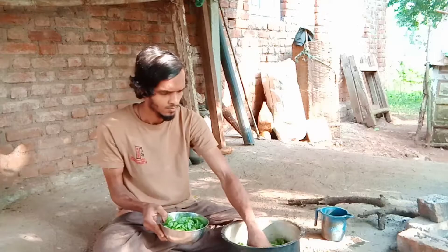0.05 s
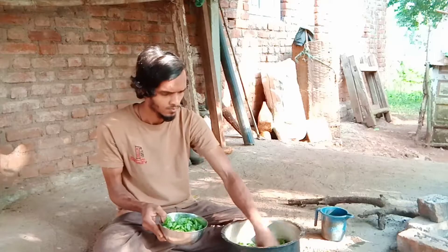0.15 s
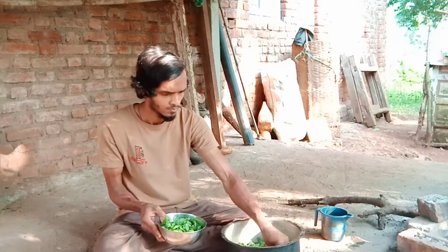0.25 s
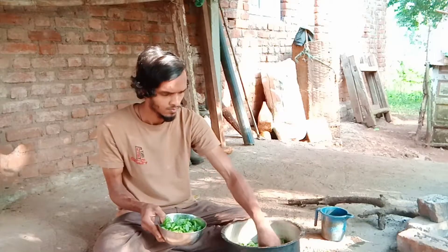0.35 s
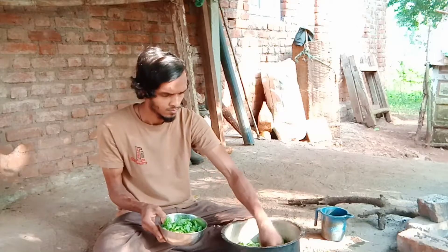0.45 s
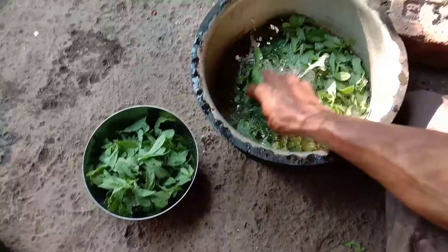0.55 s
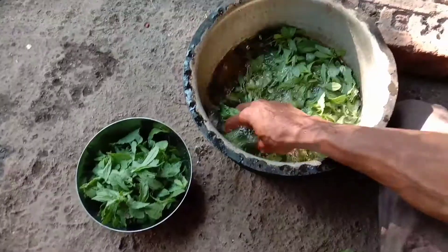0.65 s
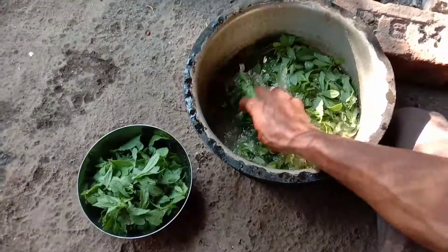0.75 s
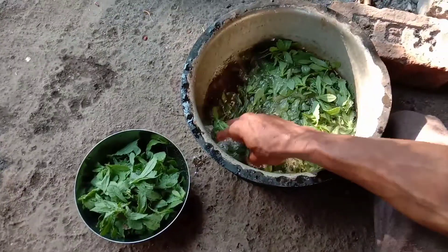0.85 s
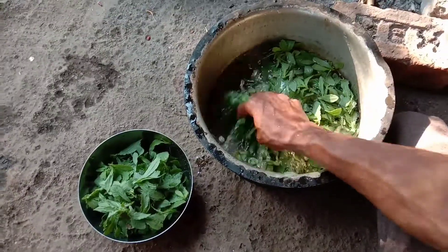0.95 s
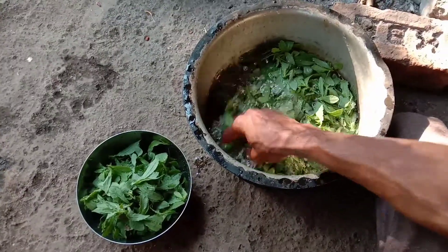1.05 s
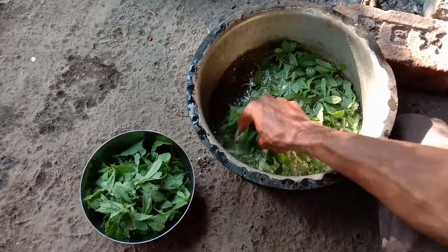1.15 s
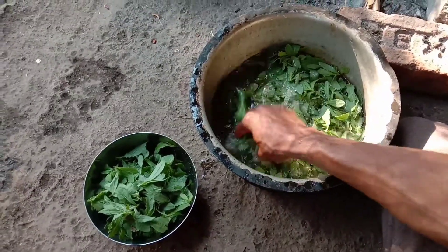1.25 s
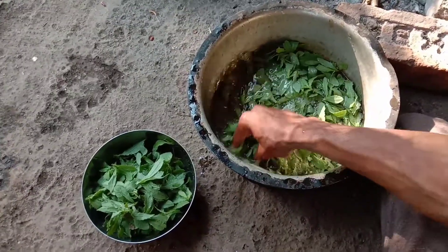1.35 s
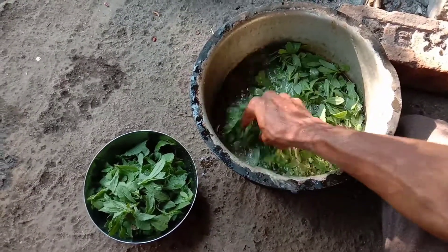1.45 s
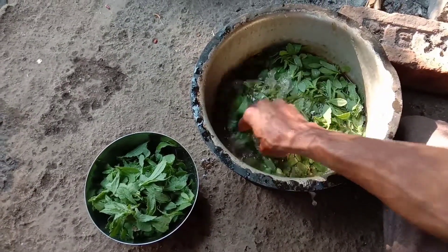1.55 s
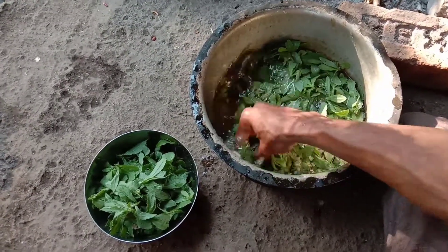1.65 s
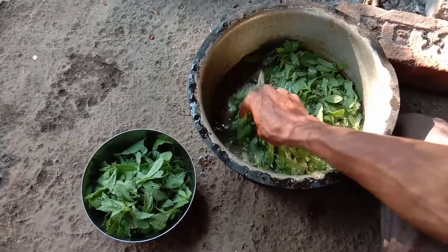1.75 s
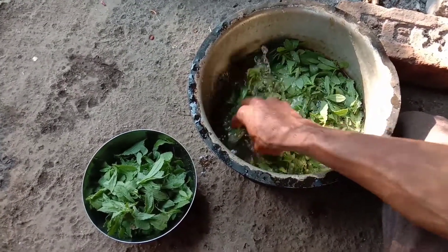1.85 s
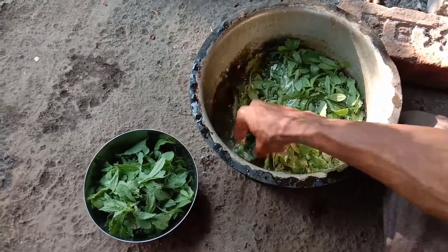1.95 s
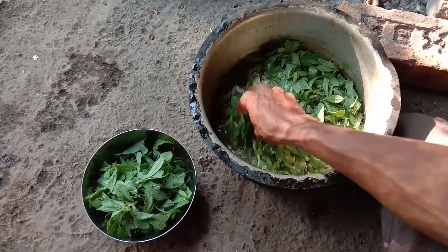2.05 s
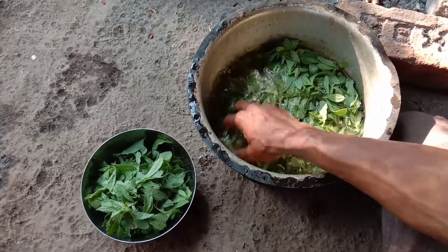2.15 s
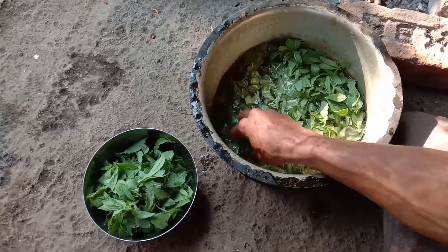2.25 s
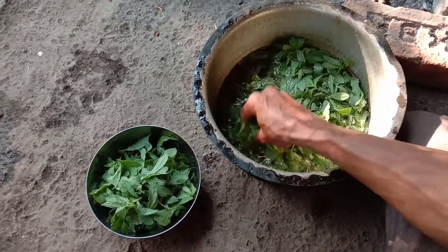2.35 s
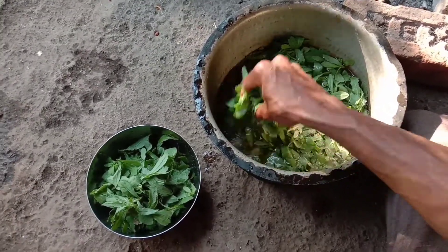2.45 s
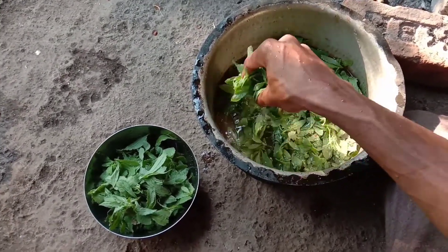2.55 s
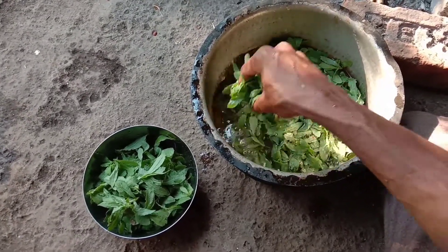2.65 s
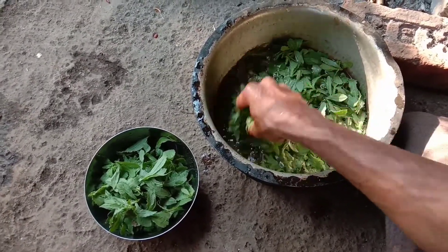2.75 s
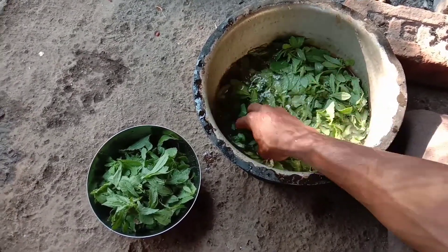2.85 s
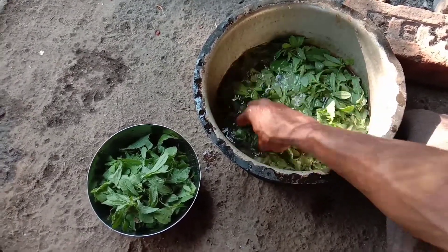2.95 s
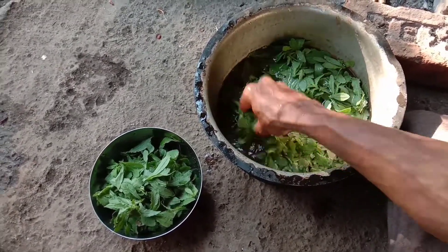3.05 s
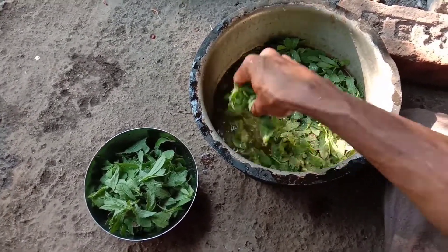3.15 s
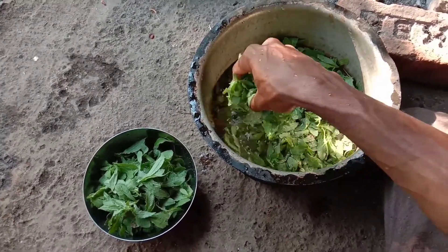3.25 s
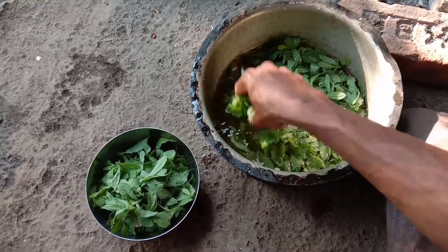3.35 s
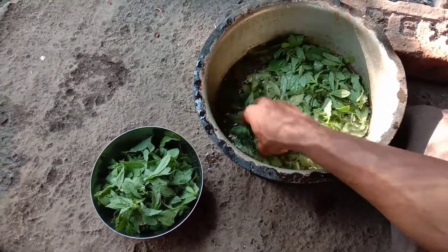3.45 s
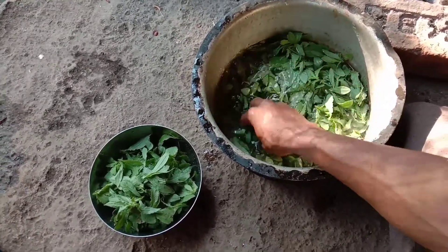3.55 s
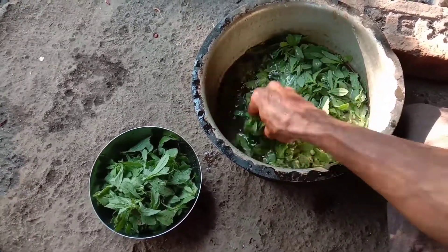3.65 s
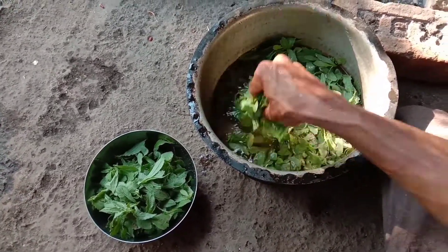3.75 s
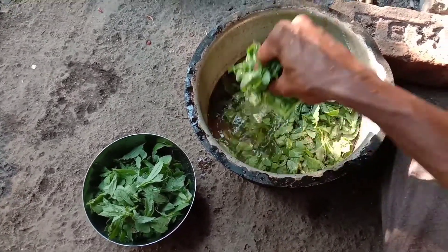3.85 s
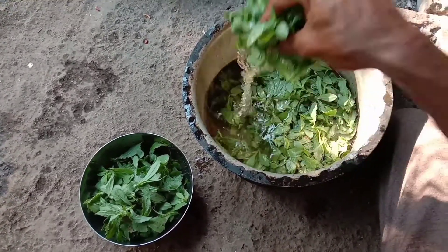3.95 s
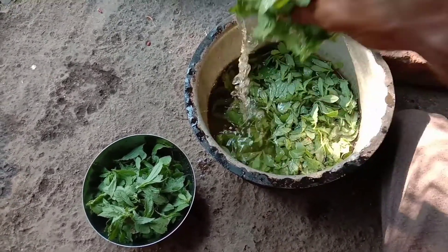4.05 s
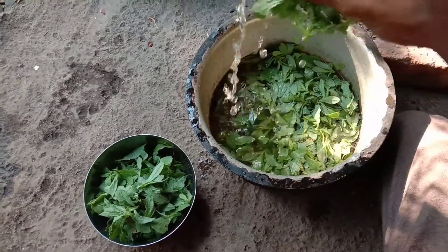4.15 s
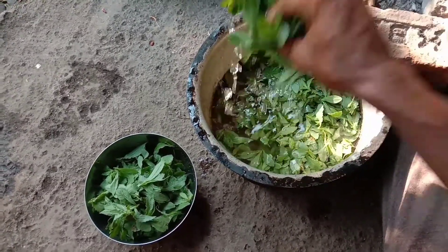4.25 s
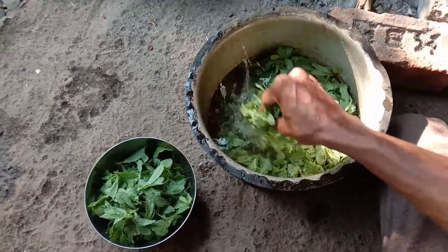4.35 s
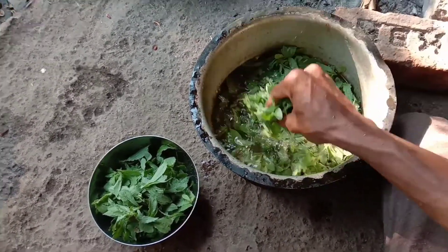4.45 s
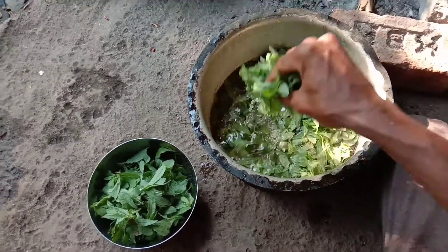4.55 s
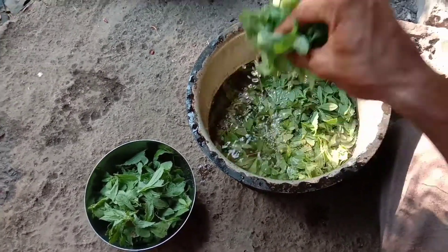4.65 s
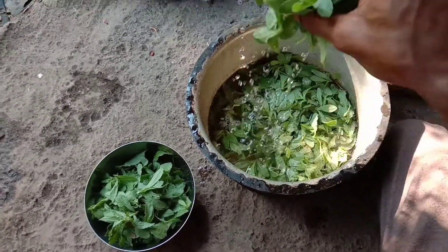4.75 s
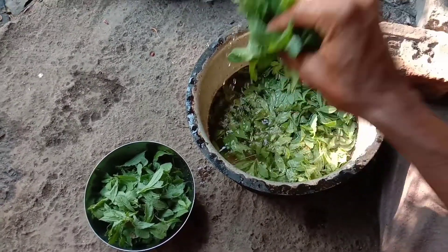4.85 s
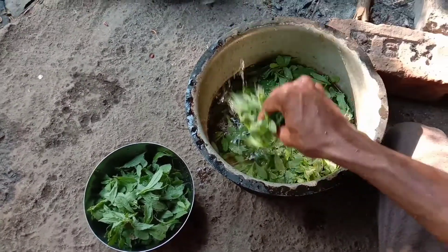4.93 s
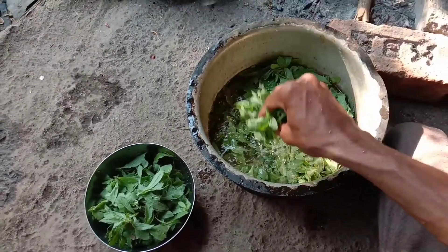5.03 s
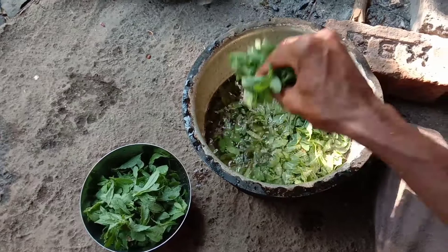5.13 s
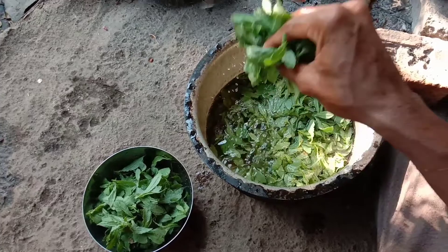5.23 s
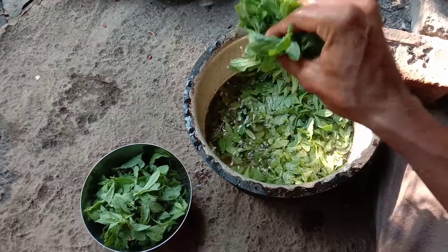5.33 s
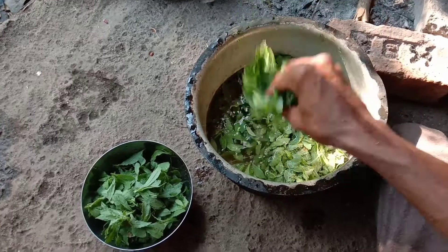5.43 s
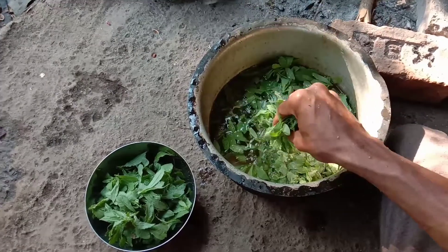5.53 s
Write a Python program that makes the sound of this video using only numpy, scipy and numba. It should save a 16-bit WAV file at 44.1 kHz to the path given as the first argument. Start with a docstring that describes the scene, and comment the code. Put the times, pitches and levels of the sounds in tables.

```python
"""Soft, distant swishing first, then abruptly loud, close swishing of leafy greens by hand round a metal pot of water.
A hum and a thin whine run throughout a quiet yard. The hand lifts and dunks a bunch three times.
Each stroke is a swarm of spray ticks and bubbles; leaf slaps and drops are short bursts of noise.
Single bubbles, soft drips, gurgles and squelches ring and rise; thuds, one ping and the pot's air are fading sines.
Faint tones swell and fade: two like far whistles, the last like the pot's ring. One close microphone colours it all."""
import sys
import numpy as np
from scipy import signal
from scipy.fft import rfft, irfft
from scipy.io import wavfile
from scipy.ndimage import uniform_filter1d
from numba import njit

SR = 44100
rng = np.random.default_rng(int(sys.argv[2]) if len(sys.argv) > 2 else 0)


def to_wav(sig):
    """Store sig (one row per channel, or 1-D mono) as 16-bit WAV at the path in sys.argv[1].

    Samples outside -1..1 are clipped; the rate is SR.
    """
    pcm = np.clip(np.atleast_2d(sig), -1, 1) * 32767
    pcm = np.round(pcm).astype(np.int16)
    wavfile.write(sys.argv[1], SR, pcm.T)  # frames by channels


N = 246519
TIME = np.arange(N) / SR

# Levels in the tables are relative: mixing, echoes and the microphone come after them.

# yard air, loudness over pitch: (pitch [Hz], level [dB])
YARD_SPECTRUM = [(20, -36), (45, -11), (70, 3.5), (110, 3.5), (170, -3), (300, -11), (700, -20),
                 (1400, -25), (3000, -38.5), (5000, -31), (7500, -23), (10000, -44.5), (16000, -65)]
# thin high whine, its separate tones: (pitch [Hz], level [dB])
WHINE_TONES = [(4330, -90), (5390, -90), (5650, -74), (8600, -91.5)]
WHINE_WIDTH_OCTAVES, WHINE_WAVER_DB = .018, 2

# pushes of the hand through the water, and gushes from the lifted bunch:
# (time [s], length [s], spray [dB], small bubbles [dB], deep sloshing [dB], swell over the stroke [dB])
STROKES = [(0.0, 0.03, -57.5, -59, -48.5, -10.5), (0.041, 0.17, -63.5, -64, -90, -3),
           (0.162, 0.047, -48.5, -56.5, -80, -10), (0.263, 0.21, -54.5, -57, -69, -19.5),
           (0.489, 0.044, -49, -50, -49.5, 6.5), (0.528, 0.14, -40, -45.5, -53, -12),
           (0.618, 0.095, -39.5, -43, -50.5, -3), (0.725, 0.2, -43.5, -46.5, -53.5, -2),
           (0.966, 0.12, -42.5, -48.5, -51, -2), (1.094, 0.11, -42, -43, -52, -14.5),
           (1.224, 0.075, -43, -48, -55.5, -3), (1.325, 0.088, -51, -52, -60, -2.5),
           (1.48, 0.088, -49.5, -59.5, -83, 3.5), (1.63, 0.08, -45.5, -51, -51.5, -12),
           (1.781, 0.12, -49.5, -55, -83, -0.5), (1.932, 0.075, -46, -53.5, -61, -10),
           (2.077, 0.067, -46, -63, -92, 4), (2.169, 0.051, -54.5, -58.5, -65, -0.5),
           (2.564, 0.15, -58, -67, -76, 6), (2.732, 0.015, -37.5, -44, -71, -2),
           (2.741, 0.12, -43.5, -50.5, -49, -7.5), (3.302, 0.1, -53.5, -55.5, -65, 8),
           (3.373, 0.14, -44.5, -52, -49, -18), (3.954, 0.076, -45, -50.5, -44, -9),
           (4.051, 0.055, -51, -60, -48.5, -0.5), (4.15, 0.039, -50.5, -63.5, -63, 2),
           (4.246, 0.023, -35, -44, -41, -10.5), (4.318, 0.069, -38, -45.5, -39, -10.5),
           (4.485, 0.22, -86, -75, -60.5, -16.5), (4.75, 0.2, -80.5, -93, -69, 9),
           (4.945, 0.12, -61, -82, -63.5, -4), (5.481, 0.011, -60, -70, -85, 3.5)]
# each layer starts quickly; deep water is slower to get going
SPRAY_ATTACK_S, BUBBLE_ATTACK_S, SLOSH_ATTACK_S = 0.012, 0.014, 0.018
RELEASE_DB_PER_S = 322.5
# the water keeps fizzing faintly after a stroke
SETTLE_DB, SETTLE_DB_PER_S = -30, 19.5
# droplet spray, loudness over pitch: (pitch [Hz], level [dB])
SPRAY_SPECTRUM = [(500, -46.5), (1200, 6), (2300, -1), (4000, -1), (5500, 14), (7600, 15.5), (10000, -6),
                  (13000, -27.5), (16000, -24)]
# colour given to the finest bubbles: (pitch [Hz], level [dB])
FIZZ_COLOUR = [(1500, -3), (2600, -5), (4000, 7), (5500, -2.5), (7600, 7.5), (10000, -16.5), (16000, 4)]

# faint drips from the wet leaves
DRIPS_PER_S, DRIP_DB, DRIP_LOW_HZ, DRIP_HIGH_HZ = 50, -85.5, 2605, 9300

# single bubbles and soft drips that stand out, low to very high:
# (time [s], pitch [Hz], level [dB], fade [cycles], pitch rise [octaves per fade time])
SINGLE_BUBBLES = [(0.0, 682, -42, 5.1, 0.043), (0.061, 1007, -44, 8.4, 0.075), (.098, 1005, -34, 11, 0.068),
                  (0.127, 1123, -39.5, 7.6, .03), (0.141, 2644, -38, 15.4, 0.019),
                  (0.302, 1010, -45, 13, 0.089), (0.581, 1230, -27.5, 5.7, 0.022),
                  (0.605, 3330, -28, 7.4, 0.056), (0.653, 1376, -16, 3.6, 0.018),
                  (.695, 990, -31, 9.8, 0.019), (0.968, 2800, -29, 2.8, 0.037),
                  (1.009, 2000, -33, 6.2, 0.034), (1.025, 1270, -27, 4.5, .03),
                  (1.058, 1216, -17.5, 2.6, 0.032), (1.095, 1192, -28, 8.8, 0.025),
                  (1.261, 1220, -22, 2.7, 0.038), (1.291, 684, -25, 1.9, 0.046),
                  (1.33, 546, -32.5, 6.9, 0.07), (1.35, 2270, -37, 7.5, 0.038),
                  (1.402, 1220, -33, 3.3, 0.024), (1.498, 2140, -17.5, 1.7, .03),
                  (1.701, 554, -24.5, 4.9, 0.079), (1.702, 870, -28.5, 4.3, 0.062),
                  (1.8611, 2125, -20, 3.5, 0.035), (1.993, 1202, -31.5, 6.3, 0.035),
                  (2.045, 2380, -39, 5.7, 0.036), (2.062, 3610, -26.5, 12.6, 0.045),
                  (2.149, 1364, -19, 7.7, 0.039), (2.297, 2480, -40, 5.8, .02),
                  (2.298, 550, -43, 6.6, 0.036), (2.395, 1910, -39.5, 13, 0.057),
                  (2.417, 1576, -35.5, 11, 0.017), (2.585, 2340, -30, 4.9, 0.012),
                  (2.738, 1254, -27, 3.6, 0.027), (2.772, 614, -23, 1.4, 0.025),
                  (2.79, 1920, -44, 3.8, .03), (2.81, 2350, -21.5, 2.4, 0.021),
                  (3.036, 2850, -48.5, 8.2, 0.032), (3.293, 2380, -48, 12, .04),
                  (3.306, 2680, -40, 6.4, .03), (3.351, 1206, -48, 7.4, 0.016),
                  (3.391, 2360, -25.5, 3.3, 0.026), (3.399, 526, -36.5, 4.7, 0.11),
                  (3.525, 1890, -44, 7.9, 0.028), (3.526, 4230, -38.5, 5.5, 0.026),
                  (3.548, 2060, -45, 5, 0.051), (3.659, 2860, -49.5, 8.8, 0.014),
                  (3.71, 6010, -36, 20, 0.017), (4.813, 7530, -31, 31, .01),
                  (3.958, 1223, -32.5, 5.9, 0.02), (3.97, 2280, -23.5, 7.8, 0.026),
                  (4.066, 657, -25, 2.9, 0.029), (4.1, 1333, -33, 3.1, 0.028),
                  (4.159, 1250, -38.5, 6.3, .03), (4.262, 585, -37, 9, 0.0062),
                  (4.254, 2250, -25, 3.6, 0.025), (4.296, 3550, -40, 9, .02),
                  (4.324, 1230, -26.5, 4.1, 0.016), (4.343, 412, -19, 7.34, 0.19),
                  (4.362, 1950, -33, 3.1, 0.035), (4.37, 4400, -39, 8, .03), (4.721, 3736, -39, 11, 0.025),
                  (5.026, 1910, -45, 27, 0.08), (5.033, 2035, -43.5, 18, 0.021),
                  (5.049, 1586, -38, 5.6, 0.017)]

# squeezes of the bunch, each a rising trill of bubbles:
# (time [s], length [s], first pitch [Hz], last pitch [Hz], level [dB], squeak against trill [dB])
SQUEEZES = [(0.141, 0.035, 2330, 2720, -52, -2), (0.25, 0.069, 1760, 2570, -56, 1),
            (2.357, 0.077, 1900, 2050, -59.5, -1), (2.418, 0.046, 1880, 2240, -48.5, 4),
            (2.438, 0.079, 2190, 2500, -50.5, 3), (5.049, 0.039, 1880, 2850, -59.5, -18)]

# bumps of the full pot on the earth: (time [s], level [dB])
POT_BUMPS = [(.243, -44), (1.13, -46), (4.940, -24), (4.9565, -19.5), (5.002, -31), (5.025, -33),
             (5.085, -41)]
# tones of that dull thud: (pitch [Hz], level [dB], time to fade by 60 dB [s])
THUD_MODES = [(99, 9, 0.09), (151.5, -8, 0.12)]

# short splats: the first is the abrupt start of the louder, closer water, the rest are wet leaves slapping it:
# (time [s], level [dB], centre pitch [Hz], decay [s], bursting film against hollow [dB])
SPLATS = [(.4925, -29.5, 890, 0.0017, -18), (.537, -24.5, 3400, 0.0023, -3), (.624, -27, 3860, 0.0022, -10),
          (.76, -29.5, 4200, 0.0028, 1), (.836, -24.5, 3300, 0.0025, -18.5),
          (1.053, -22.5, 3270, 0.004, -21), (1.058, -26.5, 3100, 0.004, 12.5),
          (1.158, -36.5, 6700, 0.0022, -7), (1.307, -32, 6070, 0.0043, 24),
          (1.561, -29, 2730, 0.0057, -2.5), (1.583, -30, 3640, 0.0012, -24.5),
          (1.769, -33, 1650, 0.0034, -18), (1.852, -30, 2400, 0.0017, -5.5),
          (1.8605, -20, 2610, 0.0028, -3.5), (2.116, -25.5, 1760, 0.0026, -25),
          (2.149, -30.5, 2200, 0.0053, 0), (2.154, -26, 5300, 0.0026, -3),
          (2.317, -34.5, 1360, 0.0051, -24), (2.594, -37.5, 4800, 0.0049, 4),
          (2.632, -37.5, 2350, 0.0027, -18), (2.647, -38.5, 4600, 0.0026, -8),
          (2.679, -36, 1560, 0.0034, -1.5), (2.747, -21, 6600, 0.0014, 5),
          (2.8552, -23.5, 2830, 0.0015, -8.5), (3.318, -34.5, 4500, 0.002, 6),
          (3.392, -30, 4200, 0.0028, 11), (3.405, -32, 3750, 0.0025, 0), (3.473, -41, 4200, 0.0026, 0),
          (3.937, -47, 4400, 0.0082, 2), (3.9595, -28.5, 5200, 0.0025, 1), (3.9695, -17, 4800, 0.0031, -28),
          (4.031, -35, 6000, .003, -14), (4.037, -22.5, 6900, 0.0014, -4), (4.099, -35.5, 5560, 0.0086, -8),
          (4.126, -29, 5770, 0.0064, -14), (4.154, -25.5, 4400, 0.0031, -15),
          (4.251, -21.5, 4350, 0.0022, -24), (4.319, -24, 4550, 0.0064, 0), (4.3272, -18, 5540, 0.0028, 2),
          (4.335, -32, 5960, 0.025, 17), (4.365, -24.5, 4030, 0.0017, -20),
          (4.913, -39.5, 4600, 0.0022, -20), (4.953, -33.5, 6830, 0.02, 6),
          (5.002, -33.5, 5240, 0.0054, -27), (5.506, -45.5, 3930, 0.0098, 3)]
SPLAT_OCTAVES, SPLAT_ATTACK_S = 0.84, 0.0012

# drops falling back, sharp on water or soft on leaves:
# (time [s], level [dB], centre pitch [Hz], bursting film against hollow [dB])
FALLING_DROPS = [(0.825, -19, 3780, -0.5), (.829, -35, 3130, 5), (0.9778, -25, 4200, -20),
                 (1.496, -16, 4260, -43), (1.4978, -22.5, 6000, -32), (3.267, -40, 6000, -30),
                 (3.331, -35, 7300, -11), (3.3377, -28, 6100, -11), (3.359, -31, 6800, -29),
                 (3.37, -28.5, 7060, -10), (4.182, -24.5, 5670, 5), (4.195, -29, 8040, -18),
                 (4.221, -21, 5600, -24), (4.344, -19, 5700, -20), (4.256, -15, 4700, -12),
                 (4.275, -16, 5700, -8.5), (4.309, -27, 5960, -21), (4.411, -31.5, 3200, 0),
                 (4.425, -33, 5800, -38), (4.599, -42, 7950, -34), (4.715, -34.5, 7920, -34),
                 (4.812, -27.5, 7560, -26.5), (4.95, -35.5, 4700, -4), (4.967, -19.5, 4590, -28),
                 (5.476, -27.5, 7630, -33)]
DROP_OCTAVES, DROP_ATTACK_S, DROP_DECAY_S = 0.3, 0.001, 0.0012

# water closing over a hollow, each a rising run of bubbles:
# (time [s], length [s], first pitch [Hz], last pitch [Hz], level [dB])
GURGLES = [(1.657, .045, 1230, 1550, -58), (1.718, 0.049, 663, 1250, -51), (2.211, .13, 378, 646, -64),
           (4.364, .05, 564, 1624, -42)]
GURGLE_CYCLES, GURGLE_SCATTER_OCTAVES = 5, .2

# showers of small drops shaken off the leaves: (time [s], length [s], level [dB])
SHOWERS = [(3.325, .09, -53), (3.975, .24, -49.5), (4.235, .19, -50)]
SPATTER_LOW_HZ, SPATTER_HIGH_HZ = 1896, 8400
SPATTER_PER_S, SPATTER_SPREAD_DB, SPATTER_CYCLES = 170, 3.5, 5

# gushes from the lifted bunch that ring the air in the open pot: (time [s], level [dB])
AIR_GUSHES = [(3.968, -40), (4.066, -38), (4.1, -40)]
# tones of that air: (pitch [Hz], level [dB], time to fade by 60 dB [s])
AIR_MODES = [(483.8, -3.5, 0.26), (1274, 2.5, 0.029), (2420, -11, 0.053)]

# faint, nearly steady tones, two like far whistles and the last like the pot's faint ring:
# (time [s], length [s], pitch [Hz], level [dB])
FAINT_TONES = [(4.769, 0.071, 900, -64.5), (4.869, 0.2, 938, -65), (5.281, 0.14, 1756, -72.5)]
TONE_SINK_OCTAVES_PER_S = 0.15

# light taps on the pot's wall: (time [s], level [dB])
POT_TAPS = [(5.503, -53.5)]
# tones of that metal wall: (pitch [Hz], level [dB], time to fade by 60 dB [s])
WALL_MODES = [(1735, 3, 0.11), (3080, -3, 0.1), (4200, -4, 0.082)]

# colour of the microphone: (pitch [Hz], level [dB])
MIC_COLOUR = [(20, -12), (6150, 1.5), (6550, -4), (7100, 4), (8500, 0.5), (11000, 8.5), (13500, 17.5),
              (15200, 33), (16000, 4.5)]
TOP_HZ = 15800


def undb(db):
    """Turn decibels into a multiplying gain."""
    return 10 ** (np.asarray(db) / 20)


def unit(x):
    """Scale a sound to an average (rms) strength of 1."""
    return x / np.sqrt(np.mean(x ** 2) + 1e-20)


def add(out, s, x):
    """Mix x into out from time s."""
    i = max(0, int(s * SR))
    out[i:i + len(x)] += x[:max(0, len(out) - i)]


def colour(x, points):
    """Filter x to follow (pitch, level) points, without sounding ahead of time."""
    hz, db = np.transpose(points)
    size = 4096
    f = np.maximum(np.fft.rfftfreq(size, 1 / SR), 1)
    curve_db = np.interp(np.log(f), np.log(hz), db)
    # folding the cepstrum puts the filter's energy as early as possible
    cepstrum = irfft(np.log(undb(curve_db)))
    cepstrum[1:size // 2] *= 2
    cepstrum[size // 2 + 1:] = 0
    response = irfft(np.exp(rfft(cepstrum)))
    return signal.fftconvolve(x, response)[:len(x)]


def band(x, hz, octaves, order=1):
    """Keep only a band of pitches, octaves wide, around hz."""
    edges = hz * 2 ** (np.array([-.5, .5]) * octaves)
    edges = np.clip(edges, 10, SR / 2 - 1000)
    return signal.sosfilt(signal.butter(order, edges, "band", fs=SR, output="sos"), x)


def surge(rate, spread_db):
    """A gain that drifts between random levels, with a new one rate times a second."""
    knots = np.clip(rng.standard_normal(1000), -1.5, 1.5)
    return undb(spread_db * np.interp(TIME * rate, np.arange(len(knots)), knots))


@njit
def bubbles(rows):
    """Pockets of air (s, Hz, gain, decay s, rise) ring, die away and climb in pitch as they near the surface."""
    out = np.zeros(N)
    for k in range(len(rows)):
        s, hz, gain, decay, rise = rows[k]
        start, life = int(s * SR), decay * SR
        fade = np.exp(-1 / life)
        glide = 2 ** (rise / life)
        opening = np.exp(-1 / max(SR / hz, life / 4))
        phase, shut = 0., 1.
        for i in range(max(start, 0), min(start + int(6 * life), N)):
            phase += 2 * np.pi * hz / SR
            gain *= fade
            shut *= opening  # the ring builds up quickly, more softly in long-lived bubbles
            if i - start < 3 * life:
                hz *= glide
            out[i] += gain * (1 - shut) * np.sin(phase)
    return out


def ring_out(s, hz, gain, cycles, rise):
    """Bubbles that fade over a number of cycles and rise in pitch."""
    return bubbles(np.column_stack([s, hz, gain, cycles / hz, rise]))


def swarm(rate, low_hz, high_hz, cycles, spread_db, rise):
    """Bubbles of random size and depth, rate a second, most faint and a few strong."""
    when, size, depth, force, climb = rng.random((30000, 5))[:int(rate * N / SR)].T
    hz = low_hz * (high_hz / low_hz) ** size
    gain = undb(spread_db * np.minimum(-np.log(1 - force), 4.5))
    return ring_out(when * N / SR, hz, gain, cycles * (.5 + depth), rise * climb)


def yard():
    """Low outdoor hum and faint hiss are shaped noise; the whine is very narrow bands of wavering noise."""
    air = unit(colour(rng.standard_normal(N), YARD_SPECTRUM)) * surge(rate=14, spread_db=1.2)
    whine = np.zeros(N)
    for hz, db in WHINE_TONES:
        tone = band(rng.standard_normal(N), hz, WHINE_WIDTH_OCTAVES, order=2)
        whine += undb(db) * unit(tone)
    return undb(-62.0) * air + whine * surge(rate=4.45, spread_db=WHINE_WAVER_DB)


def effort(column, attack):
    """Gain of one water layer over all strokes: attack, sloping hold, release and a faint settling tail."""
    power = np.zeros(N)
    for s, length, *levels, swell in STROKES:
        age = np.maximum(TIME - s, 0)
        after = np.maximum(age - length, 0)
        slope_db = swell * np.minimum(age / length, 1)
        hold = np.minimum(age / attack, 1) * undb(levels[column] + slope_db)
        release = undb(-RELEASE_DB_PER_S * after)
        settling = undb(SETTLE_DB - SETTLE_DB_PER_S * after)
        power += hold ** 2 * (release ** 2 + settling ** 2)
    return np.sqrt(power)


def even(x, span):
    """Even out the level of a swarm over span seconds, keeping its finer grain."""
    local_power = np.abs(uniform_filter1d(x ** 2, int(span * SR)))
    return x / np.sqrt(local_power + 0.014 * np.mean(x ** 2))


def crackle(rate, spread_db):
    """Tiny droplet impacts: single clicks of random strength, rate a second."""
    hit = rng.random(N) < rate / SR
    strength = undb(spread_db * np.minimum(rng.exponential(size=N), 5))
    return hit * rng.choice([-1, 1], N) * strength


def swish():
    """Moving water: fine fizz and spray on top, small bubbles between the leaves, large ones behind the hand."""
    spurts = surge(rate=100, spread_db=3.2)
    spray_gain = spurts * effort(0, SPRAY_ATTACK_S)
    bubble_gain = spurts * effort(1, BUBBLE_ATTACK_S)
    slosh_gain = spurts * effort(2, SLOSH_ATTACK_S)

    droplets = unit(colour(crackle(rate=1800, spread_db=3.5), SPRAY_SPECTRUM))
    fizz = swarm(rate=3600, low_hz=1900, high_hz=10620, cycles=5.5, spread_db=4.5, rise=0.03)
    spray = unit(colour(fizz, FIZZ_COLOUR)) + undb(-7) * droplets
    small = unit(swarm(rate=2000, low_hz=1040, high_hz=2750, cycles=4.2, spread_db=3.9, rise=0.022))
    # the air above the water favours one band
    small = small + .9 * band(small, 1260, .22)
    large = swarm(rate=650, low_hz=520, high_hz=1020, cycles=1.5, spread_db=1.5, rise=0.055)
    return (spray_gain * undb(-2.5) * even(spray, 0.013)
            + bubble_gain * undb(3.5) * even(small, 0.14)
            + slosh_gain * undb(-2.5) * even(large, 0.086))


def trickle():
    """Faint drips and bursting froth, running throughout as sparse, high ringing bubbles."""
    drips = swarm(rate=DRIPS_PER_S, low_hz=DRIP_LOW_HZ, high_hz=DRIP_HIGH_HZ, cycles=14, spread_db=3.5, rise=.03)
    return undb(DRIP_DB) * unit(drips)


def single_bubbles():
    """Single bubbles and soft drips, low to very high, each ringing at its own pitch as it rises."""
    s, hz, db, cycles, rise = np.transpose(SINGLE_BUBBLES)
    return ring_out(s, hz, undb(db), cycles, rise)


def squelches(count=32):
    """Air pressed through wet leaves: mostly ever smaller bubbles, with a high squeak as the grip tightens."""
    out = np.zeros(N)
    decay, rise = np.full(count, .003), np.full(count, .02)
    for s, length, first_hz, last_hz, db, squeak_db in SQUEEZES:
        slip, size, force = rng.uniform(-1, 1, (count, 3)).T
        part = (np.arange(count) + .5 + slip / 2) / count  # how far through the squeeze, 0 to 1
        when = s + part * length
        gain = np.sqrt(np.abs(np.sin(np.pi * part))) * undb(2.0 * force)
        hz = first_hz * (last_hz / first_hz) ** part * 2 ** (0.36 * size)
        squeak_hz = 5400 * 2 ** (0.147 * part + 0.11 * size)
        trill = bubbles(np.column_stack([when, hz, gain, decay, rise]))
        squeak = bubbles(np.column_stack([when, squeak_hz, gain * part ** 2, decay, rise]))
        out += undb(db) * unit(trill + undb(squeak_db) * squeak) * np.sqrt(length * SR / N)
    return out


def knocks(blows, modes, contact):
    """Blows ring a set of fading tones; a longer contact (in seconds) gives a softer start."""
    out, t = np.zeros(N), TIME[:SR]
    ring = np.zeros(len(t))
    for hz, db, t60 in modes:
        ring += undb(db) * np.sin(2 * np.pi * hz * t) * np.exp(-np.log(1000) * t / t60)
    for s, db in blows:
        add(out, s, undb(db) * ring * (1 - np.exp(-t / contact)))
    return out


def pot_thuds():
    """The full pot bumps on the earth: two low tones that die quickly."""
    return knocks(POT_BUMPS, THUD_MODES, contact=0.0067)


def splats(rows, octaves, attack):
    """Each splat mixes the hiss of a bursting film of water with the ring of the hollow under it."""
    out = np.zeros(N)
    t = TIME[:SR // 16]
    hiss = unit(colour(rng.standard_normal(N), SPRAY_SPECTRUM))
    for s, db, hz, decay, film_db in rows:
        shape = np.exp(-t / decay) * (1 - np.exp(-t / attack))
        hollow = band(shape * rng.standard_normal(len(t)), hz, octaves, order=3)
        film = shape * hiss[int(s * SR):][:len(t)]
        splat = unit(unit(hollow) + undb(film_db) * unit(film))
        # a longer splat carries more energy
        add(out, s - .0004, undb(db) * splat * np.sqrt(0.22 * decay / t[-1]))
    return out


def start_and_leaf_slaps():
    """The abrupt start of the louder water, then wet leaves slapping it: short noise bursts in a broad band."""
    return splats(SPLATS, SPLAT_OCTAVES, SPLAT_ATTACK_S)


def falling_drops():
    """Drops fall back: very short bursts of noise in a narrow band."""
    rows = [(s, db, hz, DROP_DECAY_S, film_db) for s, db, hz, film_db in FALLING_DROPS]
    return splats(rows, DROP_OCTAVES, DROP_ATTACK_S)


def gurgles(count=11):
    """A hollow fills and pinches off bubbles, mostly ever smaller and weaker, with random scatter."""
    out = np.zeros(N)
    for s, length, first_hz, last_hz, db in GURGLES:
        slip, size, force = rng.uniform(-1, 1, (count, 3)).T
        part = (np.arange(count) + .5 + slip / 2) / count
        hz = first_hz * (last_hz / first_hz) ** part * 2 ** (GURGLE_SCATTER_OCTAVES * size)
        gain = undb(0.53 * force - 1.1 * part)
        run = ring_out(s + part * length, hz, gain, GURGLE_CYCLES, np.full(count, .03))
        out += undb(db) * unit(run) * np.sqrt(length * SR / N)
    return out


def spatter():
    """Small drops of all sizes land at uneven intervals, each with a very short ring."""
    out = np.zeros(N)
    for s, length, db in SHOWERS:
        slip, size, force = rng.random((200, 3))[:int(length * SPATTER_PER_S)].T
        when = s + slip * length
        hz = SPATTER_LOW_HZ + (SPATTER_HIGH_HZ - SPATTER_LOW_HZ) * size
        gain = undb(SPATTER_SPREAD_DB * np.minimum(-np.log(1 - force), 3))
        ticks = ring_out(when, hz, gain, SPATTER_CYCLES, np.full(len(hz), .02))
        out += undb(db) * unit(ticks) * np.sqrt(length * SR / N)
    return out


def pot_air():
    """Gushes from the lifted bunch set the air in the open pot ringing."""
    return knocks(AIR_GUSHES, AIR_MODES, contact=0.00051)


def faint_tones():
    """Thin tones like far whistles or the pot's faint ring: sine waves that swell, fade and sink slightly in pitch."""
    out = np.zeros(N)
    for s, length, hz, db in FAINT_TONES:
        t = TIME[:int(length * SR)]
        turns = np.cumsum(hz * 2 ** (-TONE_SINK_OCTAVES_PER_S * t)) / SR
        add(out, s, undb(db) * np.sin(np.pi * t / length) * np.sin(2 * np.pi * turns))
    return out


def pot_ping():
    """A light tap on the metal wall rings its three tones briefly."""
    return knocks(POT_TAPS, WALL_MODES, contact=0.00025)


def echoes(x, t60, db):
    """Many blurred reflections, duller than the direct sound, made with a fading tail of noise."""
    t = TIME[:SR // 2]
    tail = rng.standard_normal(len(t)) * np.exp(-np.log(1000) * t / t60) * (t > .001)
    tail = band(tail, 1810, 3.06)
    return undb(db) * signal.fftconvolve(x, unit(tail) / np.sqrt(len(t)))[:N]


def scene():
    """Water, pot and yard, with quick reflections inside the pot and faint ones from the brick walls."""
    water = swish() + trickle() + single_bubbles() + squelches()
    water = water + start_and_leaf_slaps() + falling_drops() + gurgles() + spatter()
    pot = pot_thuds() + pot_air() + pot_ping()
    inside_pot = echoes(water, t60=0.012, db=-10.0)
    off_walls = echoes(water, t60=0.21, db=-15.5)
    sound = yard() + water + inside_pot + off_walls + pot + faint_tones()
    return np.array([sound, sound])


def record(dry):
    """The microphone colours the sound, and a steep filter cuts the very top."""
    heard = np.array([colour(x, MIC_COLOUR) for x in dry])
    return signal.sosfilt(signal.ellip(8, .2, 70, TOP_HZ, fs=SR, output="sos"), heard)


dry = scene()
out = record(dry)
to_wav(out)
```